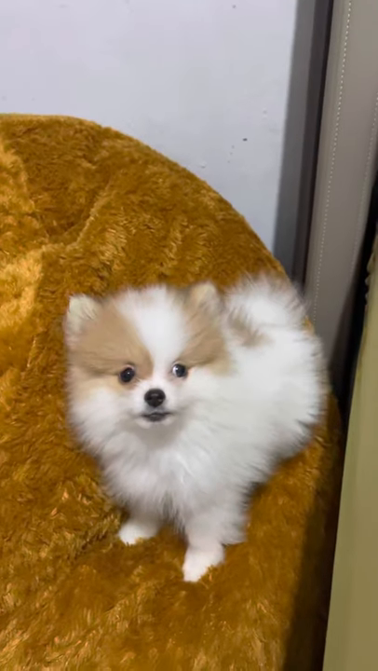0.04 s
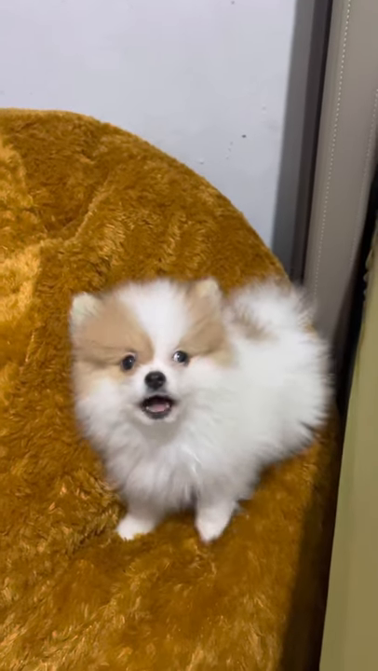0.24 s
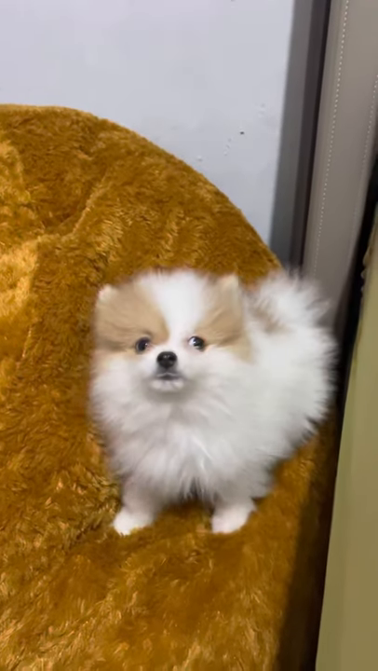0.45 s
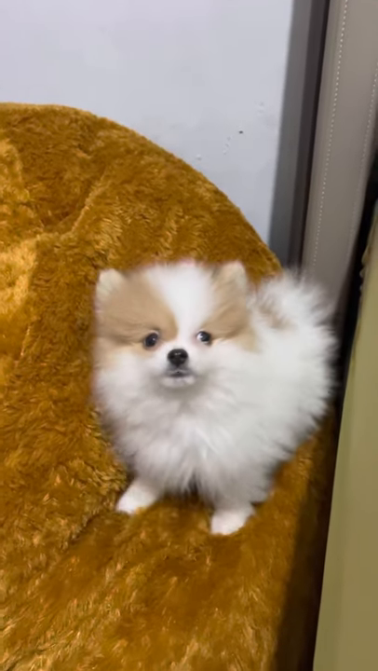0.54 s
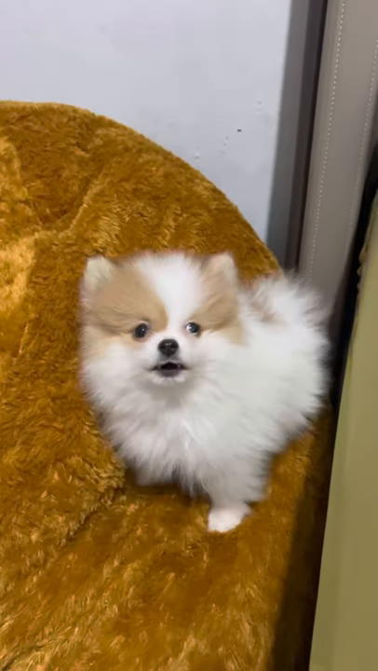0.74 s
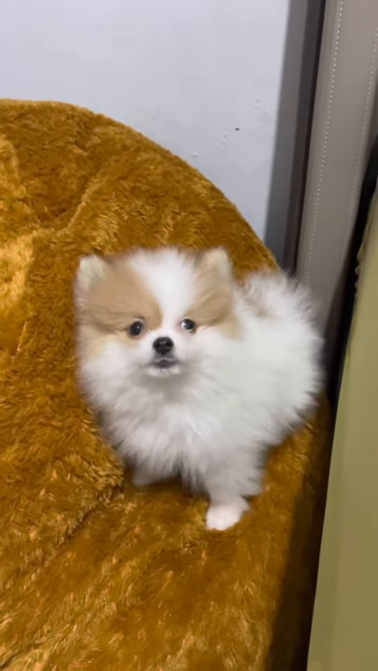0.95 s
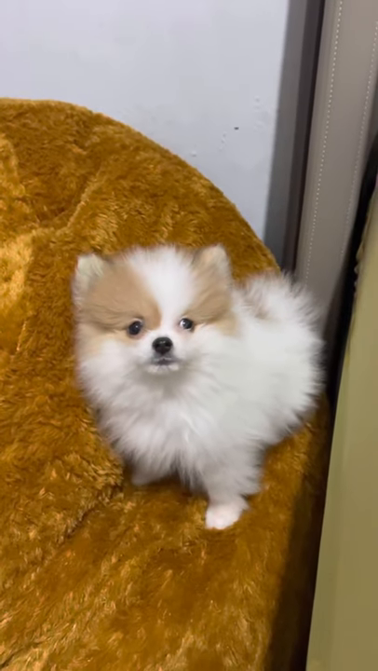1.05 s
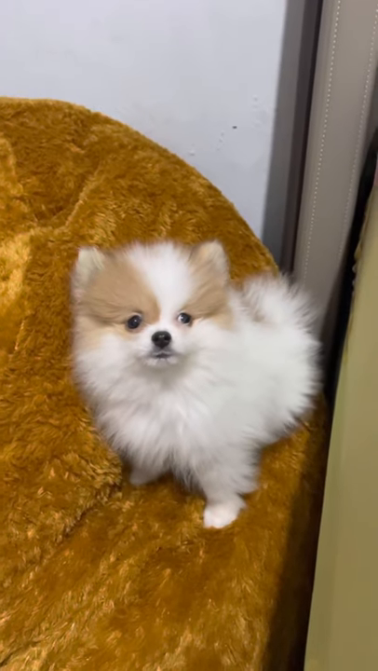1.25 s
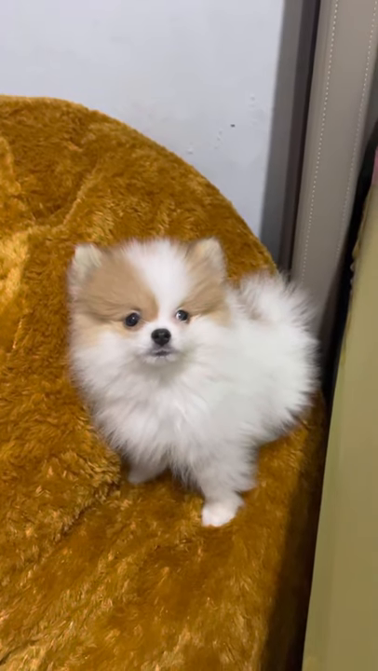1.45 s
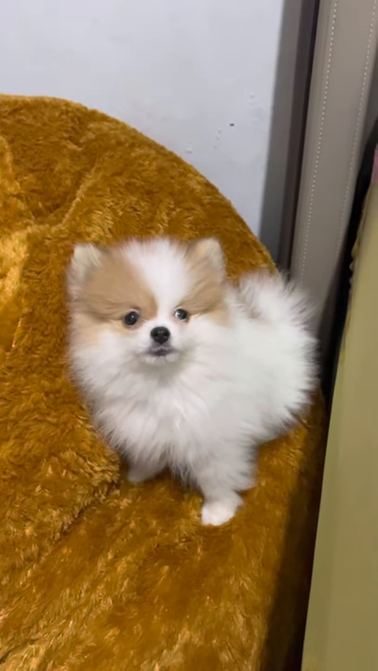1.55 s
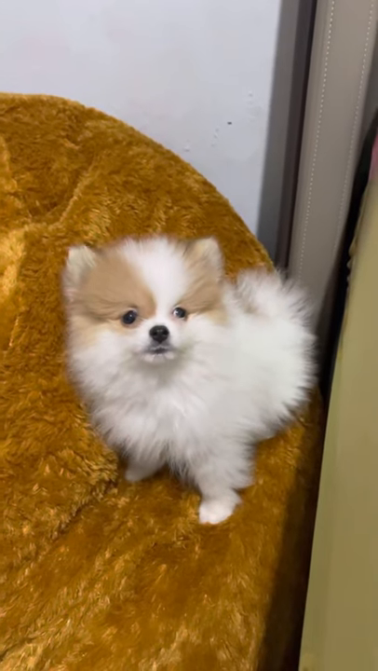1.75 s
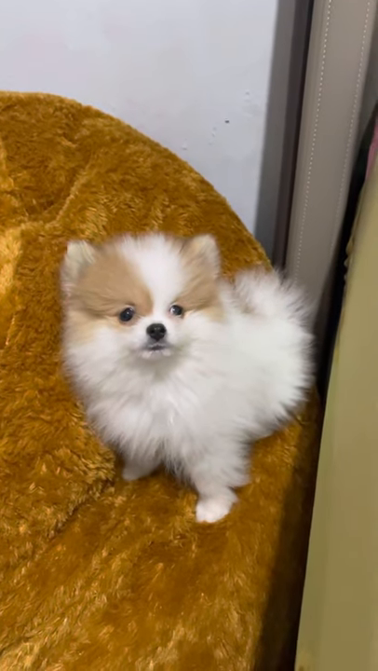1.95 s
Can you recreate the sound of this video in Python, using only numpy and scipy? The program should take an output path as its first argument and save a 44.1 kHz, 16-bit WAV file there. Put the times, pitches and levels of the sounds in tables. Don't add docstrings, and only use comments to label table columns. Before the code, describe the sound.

A small puppy close to a phone microphone lets out a falling squeak, a loud breaking yelp, a faint grumble and a thin nasal whine, pauses, then yips and sinks into a low mutter, over faint room hum.

```python
import sys
import numpy as np
from scipy import signal
from scipy.fft import rfft, irfft
from scipy.io import wavfile
from scipy.ndimage import uniform_filter1d

SR = 44100
rng = np.random.default_rng(int(sys.argv[2]) if len(sys.argv) > 2 else 0)


def natural_amplitude(level_db):
    exponent = np.asarray(level_db, float) / 20
    return 10 ** exponent


def wav_out(sig):
    wavfile.write(sys.argv[1], SR, np.round(np.clip(np.atleast_2d(sig).T, -1, 1) * 32767).astype(np.int16))


N = 88200

# time in seconds, pitch in Hz, level in dB, upper partials against the whole in dB.
SQUEAK = [(0, 1657, -30, -14), (.008, 1574, -28, -11), (.012, 1384, -26, -6), (.018, 1310, -24, -2),
          (.025, 1130, -38.5, 0.5)]
YELP_ONSET = [(0.209, 1150, -29.5, -3), (0.214, 1134, -18.5, -0.5), (.222, 1163, -15, -1.5),
              (0.228, 1196, -18.5, -1.5)]
YELP = [(.229, 650.4, -13, -7.5), (.245, 689.4, -12, -3), (.262, 722.8, -12, -2.5),
        (.29, 749.3, -14.5, -1.5), (.316, 764.8, -16, -2), (.33, 801.3, -14, -7), (.337, 792.2, -17, -4.5),
        (.352, 774.5, -13, -11), (.369, 739, -19, -10.5)]
YELP_END = [(0.373, 1336, -23.5, -7.5), (.379, 1320, -18.5, -16), (0.388, 1303, -23, -16),
            (0.397, 1248, -39, -6)]
GRUMBLE = [(.419, 454.6, -49.5, 0), (.44, 403.4, -41.5, -2), (.465, 347.2, -40.5, -0.5),
           (.515, 283.1, -41, -0.5), (.54, 337, -43.5, -9.5)]
WHINE = [(.728, 1089, -41, -5.5), (.755, 1105, -26, 0.56), (.783, 1165, -33, 1), (.809, 1082, -32.5, -2),
         (.831, 1061, -29.5, -4.5), (.865, 1114, -36, -5.5), (.885, 1075, -33, -4), (.975, 1022, -33, -6),
         (.989, 984, -32.5, -5.5),
         (1.004, 837, -26.5, -6), (1.042, 810.2, -30.5, -9.5), (1.099, 801.8, -33, -8.5),
             (1.117, 755, -33.5, -13)]
YIP_ONSET = [(1.64, 1132, -32, -5), (1.65, 1098, -22.5, -6)]
YIP = [(1.651, 569.3, -21.5, -10), (1.659, 551.7, -20, -13.5), (1.667, 563.5, -18, -6.5),
       (1.678, 647.3, -22.5, -7), (1.689, 736, -20.5, -11)]
YIP_END = [(1.691, 1119, -22, 0.5), (1.712, 1068, -25, -3.5), (1.735, 913, -24.5, -11.5),
           (1.765, 758, -28, -9.5), (1.78, 778.7, -40.5, -10.5), (1.795, 885, -34, -16.5),
           (1.812, 905, -46, -22.5)]
MUTTER = [(1.818, 368.7, -51.5, -1.8), (1.832, 342, -40.5, -2.5), (1.9, 444, -37.5, 0.3)]
GROWL = [(1.9, 168, -41.5, -1.002), (1.92, 168, -36.5, -0.52), (1.94, 160, -42, 0.15),
         (1.965, 160, -39.5, -0.17), (2.0, 150, -43.5, -1)]

# centre in seconds, length in seconds, added roughness 0-1.
FOLD_BREAKS = [(0.227, 0.0053, 0.47), (0.325, 0.013, 0.56), (0.338, 0.02, 0.5), (0.352, .02, 0),
               (0.364, 0.0033, 0.3), (0.506, 0.023, 0.65), (0.767, 0.06, 0.05), (1.114, 0.0098, 0.5),
               (0.731, .006, .3), (1.69, 0.0038, 0.43), (1.782, 0.017, 0.72), (.011, 0.0084, 0.1)]

# frequency in Hz, gain in dB.
SQUEEZED_MOUTH = [(1300, -0.5), (2500, -1.5), (3300, -6.5), (3600, -30.5), (4400, -35.5), (5400, -23.5),
                  (8000, -36)]
PARTING_MOUTH = [(2280, -8.5), (3420, -1.5), (4550, -21), (5700, -2.5), (8000, -24)]
OPEN_MOUTH = [(700, -35), (1400, -8.5), (2200, -1), (3100, 0.5), (4200, -16), (5400, -7), (6800, -8.5),
              (8000, -26)]
CLOSING_MOUTH = [(800, -4.5), (2300, -9.5), (3300, -18), (3900, -40), (4500, -19), (4900, -27.5),
                 (8000, -30)]
CHEST_VOICE = [(160, 12.5), (350, -6.5), (800, 5.5), (950, -3), (1300, -23), (3000, -58), (8500, -84)]
SHUT_MOUTH = [(800, 10), (2200, -9), (2600, -35), (4300, -25), (5200, -34), (6500, -20), (7500, -53),
              (8700, -23.5)]
HALF_OPEN_MOUTH = [(550, -14.5), (1150, -3), (1700, 11), (2400, -12), (3200, 7), (3900, -13.5), (6200, -4),
                   (8000, -24.5)]
SINKING_MOUTH = [(800, -15), (2300, -7.5), (3200, -18), (3900, -38), (4500, -9), (5000, -31.5), (6600, -21),
                 (8000, -39.5)]
GROWLING_THROAT = [(170, -21.5), (330, -16), (500, -4.5), (650, -4.5), (830, 6.5), (1000, -12), (1300, -18),
                   (8500, -73)]

CRY_TOP_DB = [-4.5, -16.5, -11.5, -7, -13.5, -44, -10, -8, -11, -13.5, -14]

# contour, mouth, edge of the upper partials in Hz, roughness 0-1.
CRIES = [
    (SQUEAK, SQUEEZED_MOUTH, 2000, .08),
    (YELP_ONSET, PARTING_MOUTH, 1800, .04),
    (YELP, OPEN_MOUTH, 1800, .025),
    (YELP_END, CLOSING_MOUTH, 1800, .04),
    (GRUMBLE, CHEST_VOICE, 520, .08),
    (WHINE, SHUT_MOUTH, 1350, .035),
    (YIP_ONSET, HALF_OPEN_MOUTH, 2500, .35),
    (YIP, HALF_OPEN_MOUTH, 2500, .09),
    (YIP_END, SINKING_MOUTH, 1350, .06),
    (MUTTER, CHEST_VOICE, 560, .3),
    (GROWL, GROWLING_THROAT, 260, .4),
]

# frequency in Hz, width in Hz, level in dB.
EARLIER_RINGS = [(1370, 110, -14.5), (1790, 150, 0.5), (2480, 300, -5.5), (5500, 450, -4.5),
                 (6670, 900, -10), (3180, 710, -15.5)]
# frequency in Hz, density in dB per Hz.
AIR_SPECTRUM = [(30, -61.5), (58, -15.5), (111, -22), (287, -21), (514, -26), (724, -31.5), (8500, -59),
                (11000, -99.5)]
# frequency in Hz, width in Hz, level in dB.
HUM_LINES = [(65, 35, -65.5), (109.5, 20, -58.5), (418.2, 30, -69), (511.5, 30, -71.5)]
# frequency in Hz, level in dB.
STEADY_LINES = [(412, -62), (511.5, -62.5)]
# time in seconds, gain in dB.
HISS_GATE = [(0, 2), (.1, 2), (.2, 2.5), (1.1, 2), (1.2, -11.5), (1.6, -6), (1.65, 6), (1.849, -5.5)]
# frequency in Hz, T60 in seconds.
ROOM_T60 = [(2000, 0.69), (7000, 0.67)]
# centre in seconds, frequency in Hz, length in seconds, level in dB.
THUMPS = [
    (0.77, 67, .03, -49.5),
    (1.781, 337, 0.0041, -44),
]
# start in seconds, end in seconds, frequency in Hz, width in Hz, level in dB.
BREATH_PUFF = (1.64, 1.82, 3996, 3501, -64.5)
# frequency in Hz, left minus right in dB, left lead in radians.
PORT_DIFFERENCE = [(150, 2, 0), (380, 8.5, 0.5), (700, 12.5, -1.5), (865, 3.5, -1.5), (1220, 4.5, -0.16),
                   (1819, 2, 0.35), (3300, 1.5, 0), (4430, -1.5, 1.5), (5703, -2, 1.16), (7430, 0.5, 1.02),
                   (9063, 0.5, 10), (11850, -2.5, 10), (13890, 2, 11.5), (15400, -0.5, 12)]
# frequency in Hz, gain in dB.
MIC_RESPONSE = [(7800, 0), (8900, -24), (9300, -59), (10900, -60.5), (12000, 5.5), (15500, 5), (15900, -75)]

FADE_S, LOW_CUT_HZ = .003, 250
JITTER, FLUTTER_DB = 0.0047, 3
ROUGH_HZ, ROUGH_CLIMB_PER_KHZ = 500, 0.42
PHASE_SHARE = .6
DULLING, DULL_FROM = 1.2, 1.75
EARLIER_DB, EARLIER_T60_S = -38.5, 0.44
AIR_DB, TOP_HISS_DB = -60, -77
AIR_SAME_LOW, AIR_SAME_HIGH = 0.28, 0.17
DUCK_DB, DUCK_HZ, DUCK_S = -14, 480, 0.053
ROOM_DB, ROOM_SAME, ROOM_DELAY_S = -17.5, 0.38, 0.0066


def evened(x):
    return x / np.sqrt(np.mean(x ** 2) + 1e-20)


def read(points, hz):
    f, value = np.transpose(points)
    return np.interp(np.log(hz + 1), np.log(f + 1), value)


def coloured(x, gain):
    first, last, fade = x[..., :1], x[..., -1:], np.hanning(2048)
    after = (2 * last - x[..., -2:-1026:-1]) * fade[1024:]
    before = (2 * first - x[..., 1024:0:-1]) * fade[:1024]
    wide = np.concatenate([x, after, before], axis=-1)
    length = wide.shape[-1]
    return irfft(rfft(wide) * gain(np.fft.rfftfreq(length, 1 / SR)), length)[..., :x.shape[-1]]


def resonate(x, hz, width_hz):
    turn = np.exp(2j * np.pi * hz * np.arange(x.shape[-1]) / SR)
    r = np.exp(-np.pi * width_hz / SR)
    smooth = signal.lfilter([(1 - r) ** 2], [1, -2 * r, r * r], x / turn)
    return 2 * (turn * smooth).real


def ports(x):
    rows = np.array(PORT_DIFFERENCE)

    def half(hz):
        return natural_amplitude(read(rows[:, :2], hz) / 2) * np.exp(.5j * read(rows[:, ::2], hz))

    def mean(hz):
        return np.maximum(abs(half(hz) + 1 / half(hz)) / 2, .5)

    x = x * np.ones((2, 1))
    left = coloured(x[0], lambda hz: half(hz) / mean(hz))
    right = coloured(x[1], lambda hz: 1 / half(hz) / mean(hz))
    return np.array([left, right])


def fold_shake(pitch_hz, length):
    low_pass = signal.butter(4, min(ROUGH_HZ, 0.5 * pitch_hz), fs=SR)
    noise = rng.standard_normal((11, N // 4))[:, :length + 400]
    return evened(signal.lfilter(*low_pass, noise)[:, 400:])


def partial_flutter(k, t):
    drift = evened(uniform_filter1d(rng.standard_normal((len(k), 200)), 6, axis=1))
    drift = np.array([np.interp(t - t[0], np.arange(200) / 200, d) for d in drift])
    return natural_amplitude(FLUTTER_DB * (k > 2) * drift)


def voice(contour, throat, edge_hz, rough, top_db):
    s, hz, db, upper_db = np.transpose(contour)
    start = max(round((s[0] - FADE_S) * SR), 0)
    end = min(round((s[-1] + FADE_S) * SR), N)
    t = np.arange(start, end) / SR
    shake = fold_shake(hz.mean(), len(t))
    pitch = np.interp(t, s, hz) * (1 + JITTER * shake[-1])
    upper_db = np.minimum(np.interp(t, s, upper_db), -.05)
    k = np.arange(1, 24)[:, None]
    f = k * pitch

    rough = rough + sum(r * np.exp(-(2 * (t - c) / w) ** 2) for c, w, r in FOLD_BREAKS)
    rough = rough * (1 + ROUGH_CLIMB_PER_KHZ * f / 1000) * np.where(k > 1, 1, .25)
    rough = np.clip(rough + .35 * (f > 10000), 0, 1)

    dulling_db = DULLING * upper_db * np.log2(np.clip(f / edge_hz / DULL_FROM, 1, 2))
    weight = natural_amplitude(read(throat, f) + dulling_db + top_db * (f > 10000)) * (f < 16500)
    weight = weight * partial_flutter(k, t)

    def part(w):
        return w / np.sqrt((w ** 2 * (f < 8000)).sum(0) / 2)

    upper = 1 / (1 + np.exp((edge_hz - f) / 60))
    share = natural_amplitude(2 * upper_db)
    weight = np.sqrt(share) * part(weight * upper) + np.sqrt(1 - share) * part(weight * (1 - upper))

    pair = k[:, 0] % 5 * 2
    noise = (shake[pair] + 1j * shake[pair + 1]) / np.sqrt(2)
    wobble = np.sqrt(1 - rough ** 2) + rough * noise
    wobble = wobble / (abs(wobble) + 1e-3) ** PHASE_SHARE
    phase = 2 * np.pi * k * np.cumsum(pitch) / SR + 0.28 * k ** 2
    wave = (weight * wobble * np.exp(1j * phase)).real.sum(0)

    fade_in = (t - s[0]) / FADE_S + 1 + (s[0] < FADE_S)
    fade_out = (s[-1] - t) / FADE_S + 1
    out = np.zeros(N)
    out[start:end] = wave * np.clip(np.minimum(fade_in, fade_out), 0, 1) * natural_amplitude(np.interp(t, s, db))
    return out


def puppy():
    cries = sum(voice(*cry, top_db) for cry, top_db in zip(CRIES, CRY_TOP_DB))
    return coloured(cries, lambda hz: 1 / (1 + (LOW_CUT_HZ / (hz + 1)) ** 6))


def earlier_cries():
    noise = rng.standard_normal((3, N))
    both = noise[0] + 0.13 * noise[1:]
    ring = sum(natural_amplitude(db) * evened(resonate(both, hz, width_hz)) for hz, width_hz, db in EARLIER_RINGS)
    return ring * natural_amplitude(EARLIER_DB - 60 * np.arange(N) / SR / EARLIER_T60_S)


def appliance():
    t = np.arange(N) / SR
    hum = sum(natural_amplitude(db) * evened(resonate(rng.standard_normal(3 * N), hz, width_hz)[-N:])
              for hz, width_hz, db in HUM_LINES)
    return hum + sum(natural_amplitude(db) * np.sqrt(2) * np.sin(2 * np.pi * hz * t) for hz, db in STEADY_LINES)


def background(dog):
    a, b = rng.standard_normal((2, N))

    def same(hz):
        return np.where(hz < 300, AIR_SAME_LOW, AIR_SAME_HIGH)

    other = coloured(a, same) + coloured(b, lambda hz: np.sqrt(1 - same(hz) ** 2))
    air = coloured(np.array([a, other]), lambda hz: natural_amplitude(read(AIR_SPECTRUM, hz)) * (hz < 9000))
    air = natural_amplitude(AIR_DB) * evened(air)
    hum = appliance()
    gate_db = np.interp(np.arange(N) / SR, *np.transpose(HISS_GATE))
    hiss = natural_amplitude(TOP_HISS_DB + gate_db) * evened(coloured(a, lambda hz: hz > 11500))

    keep = np.exp(-1 / (DUCK_S * SR))
    loud = dog ** 2
    for _ in range(2):
        loud = signal.lfilter([1 - keep], [1, -keep], loud)
    low = coloured(air + hum, lambda hz: hz < DUCK_HZ)
    duck = natural_amplitude(DUCK_DB * loud / loud.max()) - 1
    return ports(air + duck * low + hum + hiss)


def room(x):
    hz, t, z = signal.stft(rng.standard_normal((3, SR)), SR, nperseg=256)
    decay = natural_amplitude(-60 * t / read(ROOM_T60, hz)[:, None])
    tail = signal.istft(z * decay, SR, nperseg=256)[1][:, :SR]
    tail = tail * (np.arange(SR) / SR > ROOM_DELAY_S)
    tail = natural_amplitude(ROOM_DB) * tail / np.linalg.norm(tail[0])
    wet = signal.fftconvolve(x[None], tail, axes=1)[:, :N]
    return ROOM_SAME * wet[0] + np.sqrt(1 - ROOM_SAME ** 2) * wet[1:]


def thumps():
    t = np.arange(N) / SR
    return sum(natural_amplitude(db) * np.exp(-((t - s) / length_s) ** 2) * np.sin(2 * np.pi * hz * (t - s))
               for s, hz, length_s, db in THUMPS)


def breath_puff():
    t = np.arange(N) / SR
    start_s, end_s, hz, width_hz, db = BREATH_PUFF
    puff = evened(resonate(rng.standard_normal(N), hz, width_hz))
    return natural_amplitude(db) * puff * (t > start_s) * (t < end_s)


def scene():
    dog = puppy()
    near = dog + earlier_cries() + room(dog) + thumps() + breath_puff()
    return ports(near) + background(dog)


def top_cut(x):
    return signal.sosfilt(signal.butter(12, 15870, fs=SR, output="sos"), x)


def record(dry):
    mix = coloured(dry, lambda hz: natural_amplitude(read(MIC_RESPONSE, hz)))
    return top_cut(mix)


dry = scene()
out = record(dry)
wav_out(out)
```